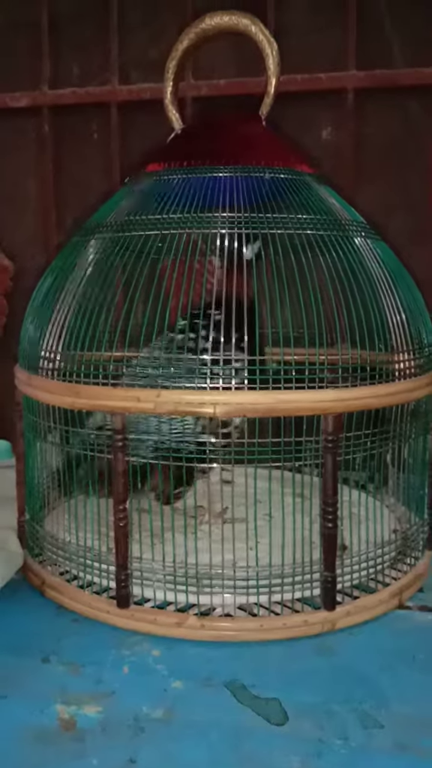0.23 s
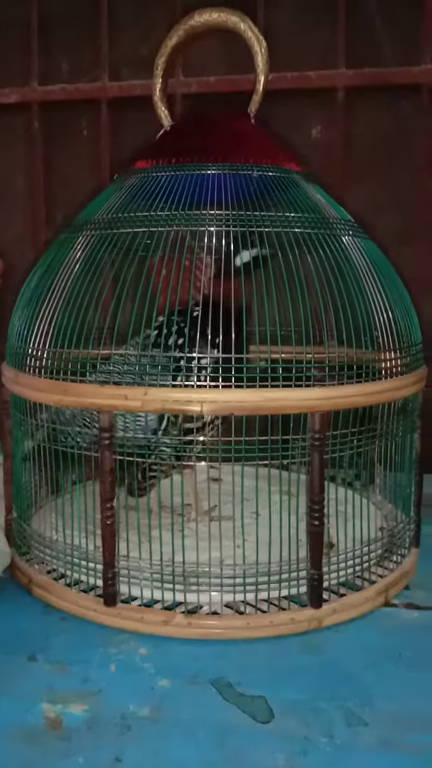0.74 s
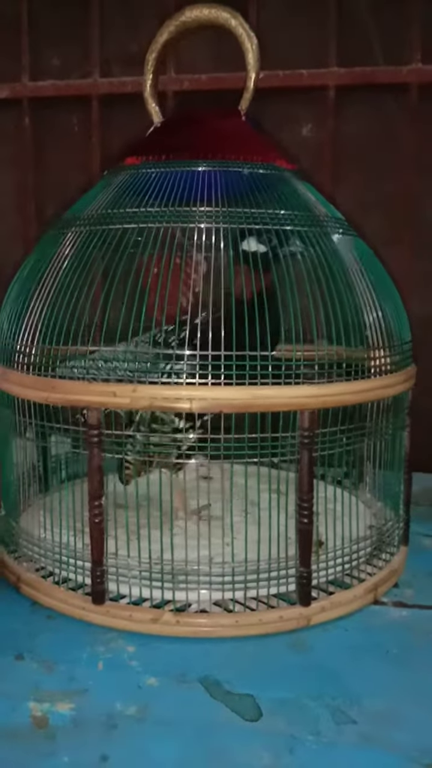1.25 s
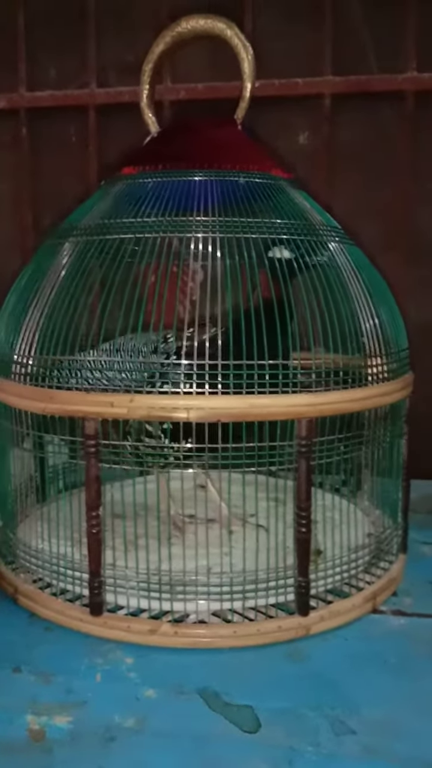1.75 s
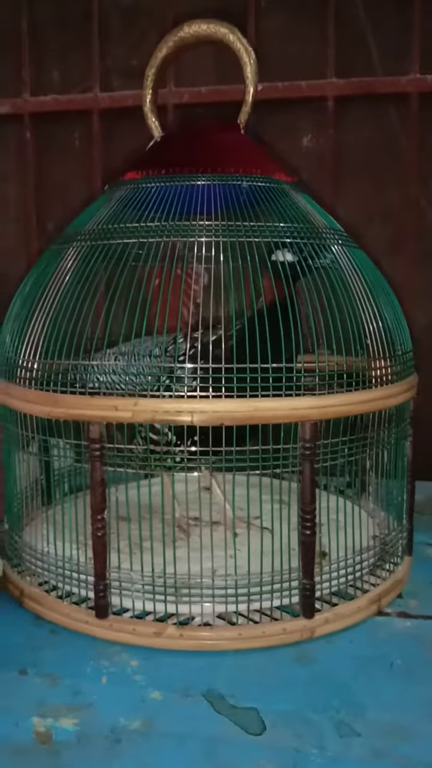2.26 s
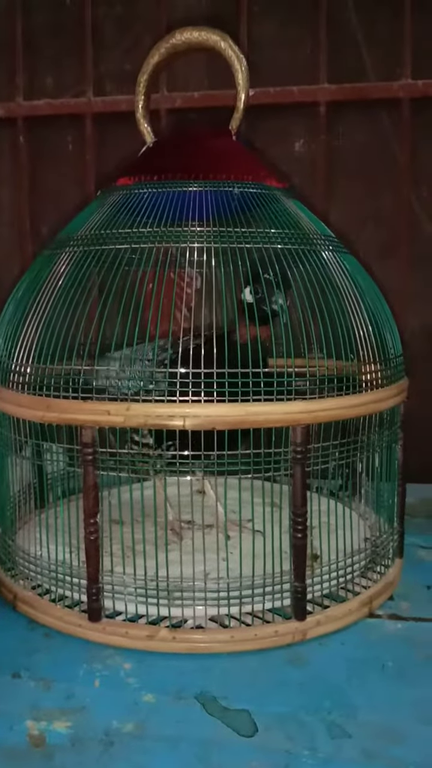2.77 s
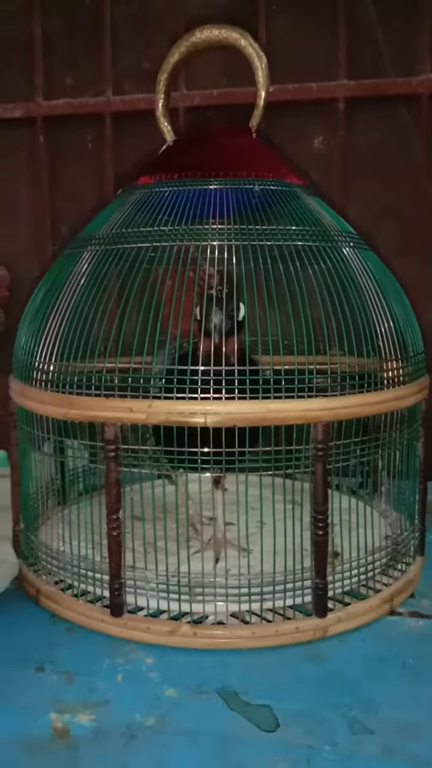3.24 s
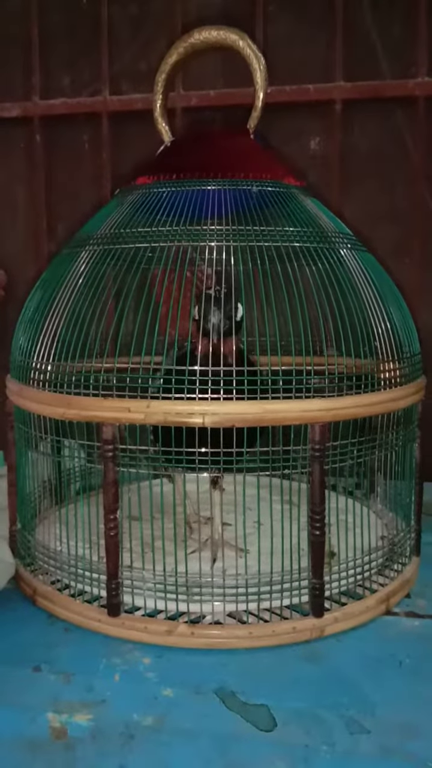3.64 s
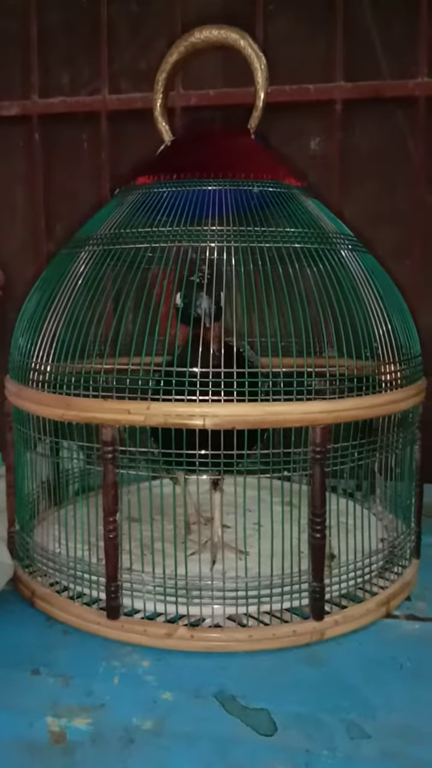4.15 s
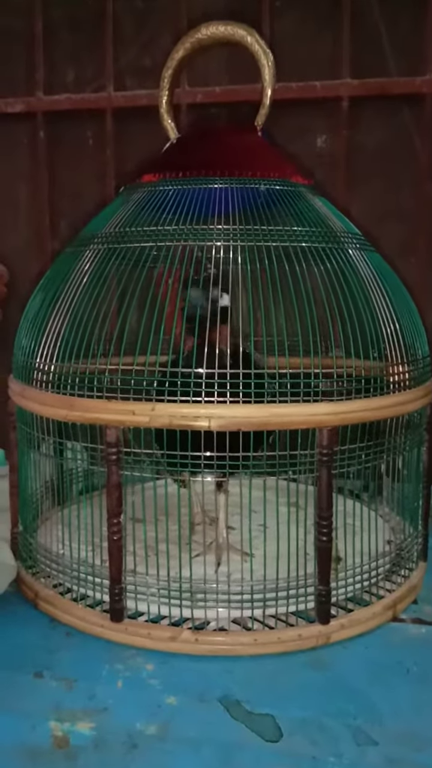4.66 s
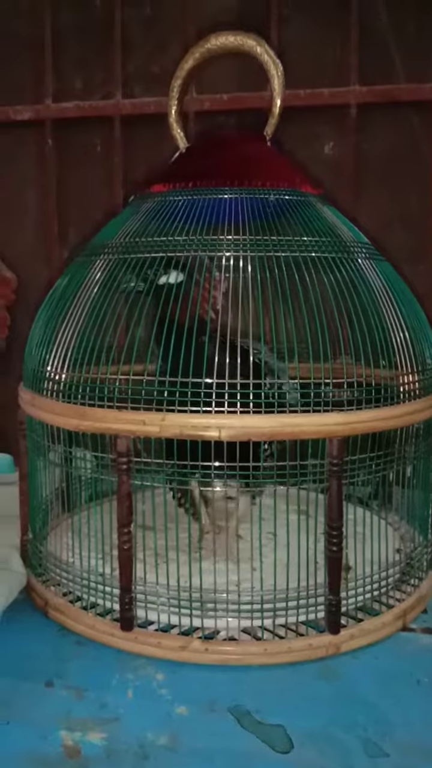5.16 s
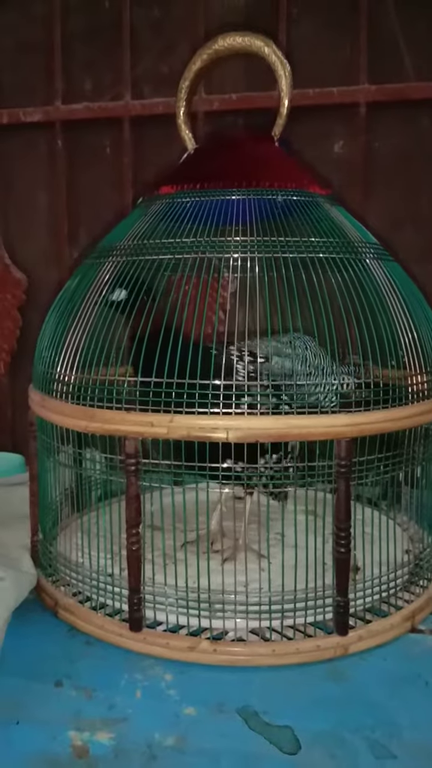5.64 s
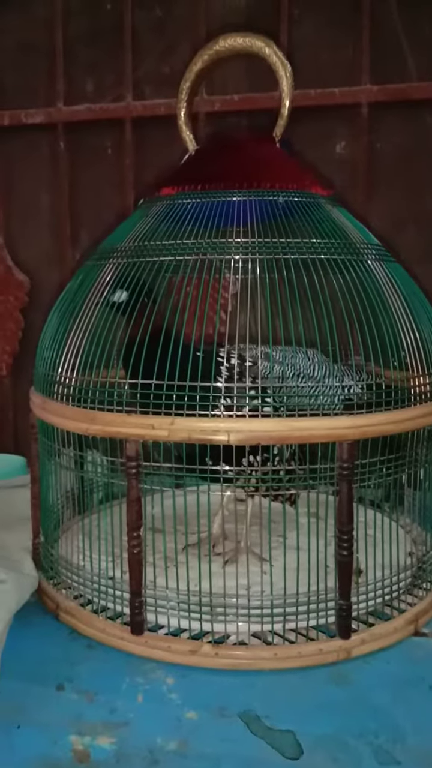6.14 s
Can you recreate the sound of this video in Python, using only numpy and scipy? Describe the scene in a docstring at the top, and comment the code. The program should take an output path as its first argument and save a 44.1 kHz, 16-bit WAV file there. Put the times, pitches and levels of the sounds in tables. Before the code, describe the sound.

At 0 seconds the echo of an earlier rasp still hangs in a bare, reflective room. From about 0.1 to 0.3 seconds a close caged game bird gives a loud harsh rasp with small clucks, ending in a very short, shrill rising whistle and a soft low thump. A second cluster follows from 0.6 to 0.95 seconds: clucks, short grating rasps and another piercing chirp, then a bright echo fading over roughly half a second. The gain ducks under the calls and climbs back. From 1.5 seconds a low steady hum and gentle hiss dominate, with faint insect-like throbbing and light, bright claw ticks on wire, clearest near 1.5, 2.9 and 3.2 seconds. A barely audible distant swell passes around 3. At 4.8 seconds comes a quiet double note, cluck then brief falling croak. The hum sinks away, leaving a faint bed and tiny ticks until about 6.4 seconds.

```python
"""Rasps, shrill whistles and small clucks end a caged game bird's loud call; later comes one short double note.
The rasps are pulses and breath ringing a throat, the whistles gliding sines, the clucks ringing modes.
A bare room echoes the bird. Soft thumps are dying sines; claws tick on the cage in bursts of bright noise.
Behind lie coloured noise, whose broad hum and hiss sinks away late on, and narrow bands, one throbbing like insects.
The recorder turns its gain down under the loud notes and lets it climb back in their tails."""
import sys
import numpy as np
from scipy import signal
from scipy.fft import rfft, irfft
from scipy.io import wavfile

SR = 44100
rng = np.random.default_rng(int(sys.argv[2]) if len(sys.argv) > 2 else 0)


def materialize(psi):
    """Save the field psi as 16-bit PCM at rate SR to the path in sys.argv[1].

    A 1-D psi becomes a single channel; in a 2-D psi each row is a channel.
    """
    bounded = np.clip(np.atleast_2d(psi).T, -1, 1)
    quanta = np.round(bounded * 32767).astype(np.int16)
    wavfile.write(sys.argv[1], SR, quanta)


N = 282240
LEAD = SR // 4   # samples before the start, so that an earlier note is still ringing
TOTAL = N + LEAD

# Rasped notes. Each row: start in seconds, length in seconds, relative level in dB, loss by the end in dB,
# weight of the 4 kHz throat mode in dB, weight of the 5.4 kHz mode in dB.
RASP_NOTES = [(-.2, 0.13, -6.5, -11, -13, 1), (0.125, 0.14, 6.5, 8.5, 3.5, 4),
              (.284, 0.031, 9, 11, -11, 0.5), (0.619, 0.072, 7, 6, -0.5, 3.5),
              (0.766, 0.0504, -0.5, -1, -15, 7), (0.825, .11, 4.5, 8, -4.5, 6)]
# Throat modes. Each row: pitch in Hz, width of each of two passes in Hz, level in dB.
# The second and third rows are the modes that the beak reweights.
THROAT_MODES = [(2817, 240, 1), (3895, 190, -5.5), (5338, 750, 2.5), (6170, 530, -4.5), (4724, 1160, 0.5),
                (3250, 2650, -2), (7100, 490, -7), (8780, 2700, -18), (15400, 2100, -24.5)]
# Whistles. Each row: start in seconds, length in seconds, pitch from in Hz, pitch to in Hz, climb in seconds,
# creep in Hz per second, level before the climb weakens it in dB, second partial at full pitch in dB.
WHISTLE_NOTES = [(.257, .031, 5900, 6470, .004, 3500, 3, -33),
                 (.794, .034, 5500, 6600, .015, -3500, 4, -33),
                 (4.781, .021, 2400, 5030, .004, 25000, -14, -12)]
# Clucks. Each row: start in seconds, level before the swell and decay in dB, pitch in Hz, upper mode relative in dB.
CLUCK_NOTES = [(.102, -24, 1310, 2.5), (.126, -17, 1520, 6), (.593, -25, 1430, 2), (.609, -18.5, 1430, -5),
               (.692, -9.5, 1380, -10), (.749, -16.5, 1307, 3), (.763, -8, 1380, -7),
               (.909, -16, 1410, -15), (4.768, -12.5, 1263, -9), (4.78, -9.5, 1404, -12.5)]
# Spectrum of the croak's partials. Each row: pitch in Hz, level in dB.
CROAK_SPECTRUM = [(700, -10), (1800, -7.5), (2600, -7), (3500, -2), (4500, -9), (6200, -5.5), (8500, -23.5),
                  (12000, -44), (15000, -26)]
# Room echoes. Each row: pitch in Hz, time to fall 60 dB in seconds, relative level in dB.
ROOM_DECAY = [(500, 0.39, 3), (2060, 0.85, 2.5), (6000, 0.64, 3), (6700, 0.77, 1), (10000, 0.44, 0.5),
              (15000, 0.44, 6)]
# Soft low thumps under the whistles. Each row: start in seconds, level before the swell and decay in dB,
# pitch in Hz, time to fall 60 dB in seconds.
LOW_THUMPS = [(.268, -10.5, 97, 0.11), (.795, -27, 110, 0.11)]
# Claws on the cage. Each row: start in seconds, level of the rattle in dB.
CLAW_TICKS = [(1.4734, -39.5), (2.0594, -50), (2.3894, -53), (2.9094, -39), (3.2013, -39.5),
              (3.2879, -39.5), (3.8911, -52), (4.1294, -43), (4.3313, -49), (4.5251, -42), (5.475, -53),
              (5.574, -52), (5.694, -43.5), (5.737, -52), (5.9628, -51), (6.336, -47)]
# Spectrum of the ticks. Each row: pitch in Hz, relative level in dB per Hz.
TICK_SPECTRUM = [(2000, -9), (5500, 13.5), (8000, 0.5), (12000, -22), (15300, 3)]
# Spectrum of the broad hum and hiss. Each row: pitch in Hz, relative level in dB per Hz.
HUM_SPECTRUM = [(18, -56), (30, -29.5), (97, 0), (148, 2.5), (332, -5.5), (479, -9), (921, -8.5),
                (1020, -17), (1260, -11), (2300, -24), (3590, -22), (5740, -8.5), (9190, -34), (12900, -49),
                (15500, -28.5)]
# Resonances added on top of the hum. Each row: pitch in Hz, width in Hz, gain in dB.
HUM_RESONANCES = [(5790, 20, 7.5), (2964, 79, 6), (4150, 250, 0), (338, 10, 0.5)]
# Spectrum of the bed that stays. Each row: pitch in Hz, relative level in dB per Hz.
STILL_SPECTRUM = [(30, -37), (55, -10.5), (114, 3), (213, -8), (292, -5), (399, -30.5), (1200, -23),
                  (1590, -36), (3320, -29.5), (4190, -18), (6200, -12.5), (8060, -55), (12600, -54),
                  (15500, -36)]
# Faint far sound that swells once. Each row: time in seconds, level in dB.
FAR_SWELL = [(2.88, -54), (3.0, -38), (3.18, -42), (3.3, -46)]
# Narrow bands of the background. Each row: pitch in Hz, width of each of two passes in Hz, level in dB,
# mean throbs per second, throb depth in dB, uneven flicker in dB.
NARROW_BANDS = [(7200, 320, -53, 9.9, 3.2, 1.5), (1245, 90, -63, 0, 0, 2.5), (4280, 500, -60, 0, 0, 1.0),
                (5850, 600, -60, 0, 0, 1.0), (15200, 900, -74, 0, 0, 3.5)]

# Rasps: pulse rate before jitter, jitter as a log spread, pulse spread in dB, breath against pulses of rms 1.
RASP_PER_S, RASP_JITTER, RASP_SPREAD_DB, RASP_BREATH = 560, 0.3, 2.5, 0.76
RASP_SWELL_SHARE, RASP_START_DB = 0.35, -15   # swell as a share of the note, and the level it starts from
RASP_RELEASE_S, RASP_RELEASE_DB = 0.0084, -25
NARROW_LOW_DB, NARROW_HIGH_DB = 13.5, -16   # narrow beak at first: 4 kHz mode up, 5.4 kHz mode down
RASP_EDGE_HZ = 2200   # only the windpipe mode bypasses this low cut
WINDPIPE_HZ, WINDPIPE_WIDTH_HZ, WINDPIPE_DB = 1350, 650, -23
# Whistles
PITCH_LAG_S, WHISTLE_EDGE_S, WHISTLE_RISE_DB = 0.002, 0.003, 0.5   # the pitch trails the muscle
CLIMB_DB_PER_SPEED = 75   # loss per octave per millisecond of upward glide
SECOND_DB_PER_OCTAVE = 70   # loss of the second partial while the pitch is low
# Clucks, with the puff of air that starts each one
CLUCK_OVERTONE, CLUCK_RISE_S, CLUCK_T60_S = 1.51, 0.00075, 0.029   # the overtone is a pitch ratio
PUFF_DB, PUFF_T60_S, PUFF_HZ, PUFF_WIDTH_HZ = -4.5, 0.029, 3800, 3500
# Croak
CROAK_S, CROAK_LENGTH_S, CROAK_EDGE_S, CROAK_DB, CROAK_SAG_DB = 4.866, 0.029, 0.006, -22, 5.5
CROAK_HZ, CROAK_FALL_HZ_PER_S, CROAK_BREATH = 953, 6600, 0.12
# Room
ROOM_DB, FIRST_ECHO_S = -5.5, 0.0031
ECHOES_PER_S, ECHO_GROWTH_S = 1200, 0.02   # density at first, time in which it doubles
FLUTTER_S, FLUTTER_SHARE = 0.0378, 0.49   # low sound bounces between two facing walls
FLUTTER_LOW_HZ, FLUTTER_CUT_HZ = 85, 3600
# Ticks and rustles
TICK_T60_S, SNAP_DB, SNAP_T60_S = 0.15, 5, 0.0052   # the snap's level is relative to its tick
RUSTLE_PER_S, RUSTLE_DB, RUSTLE_SPREAD_DB, RUSTLE_T60_S = 13, -69, 2.7, 0.057
# Background
HUM_DB, HUM_END_DB, HUM_STOP_S, HUM_FADE_S = -34.5, -59.5, 4.68, 0.48   # fade time constant
HUM_FLICKER_DB, HUM_FLICKER_S = 1.23, 0.031
BASS_HZ, BASS_WAVER_DB, BASS_WAVER_S = 313, 2.5, 0.022   # the bass of the hum swells and sinks by itself
STILL_DB = -52
SWELL_HZ, SWELL_WIDTH_HZ = 2540, 710
DIP_HZ, DIP_WIDTH_HZ, DIP_SHARE = 6650, 226, 0.6   # a narrow gap in the hiss
# Recorder
KNEE_DB, SQUEEZE, RELEASE_DB_PER_S = -10, 0.77, 110   # squeeze is dB of cut per dB above the knee
ATTACK_S, AHEAD_S, CUTOFF_HZ = 0.001, 0.003, 15560


def rasps():
    """The syrinx slams shut unevenly and air hisses through; both ring the throat, reweighted as the beak moves."""
    gate, level_db, low_db, high_db = in_time([rasp_shape(*row) for row in RASP_NOTES])
    slam_count = np.cumsum(RASP_PER_S * np.exp(RASP_JITTER * drift(0.001))) / SR
    pulses = np.diff(np.floor(slam_count), prepend=0)
    pulses = pulses * amp(RASP_SPREAD_DB * rng.standard_normal(TOTAL))
    breath = RASP_BREATH * rng.standard_normal(TOTAL)
    source = (rms_one(pulses) + breath) * gate * amp(level_db)
    weights = [1, amp(low_db), amp(high_db)] + [1] * 6
    voice = 0
    for k, (throat_mode, weight) in enumerate(zip(THROAT_MODES, weights)):
        voice = voice + (-1) ** k * mode(source * weight, *throat_mode)   # neighbours in opposite phase
    edge = signal.butter(4, RASP_EDGE_HZ, "high", fs=SR, output="sos")
    return signal.sosfilt(edge, voice) + mode(source, WINDPIPE_HZ, WINDPIPE_WIDTH_HZ, WINDPIPE_DB)


def rasp_shape(s, length, db, loss_db, low_db, high_db):
    """Swell while the beak opens, sag, quick release: rows of time in s, level dB and two mode weights in dB."""
    end_db = db - loss_db
    return [(s, db + RASP_START_DB, low_db + NARROW_LOW_DB, high_db + NARROW_HIGH_DB),
            (s + RASP_SWELL_SHARE * length, db, low_db, high_db),
            (s + length - RASP_RELEASE_S, end_db, low_db, high_db),
            (s + length, end_db + RASP_RELEASE_DB, low_db, high_db)]


def whistles():
    """Nearly pure glides with a weak second partial: the pitch climbs, then creeps, and a fast climb is weaker."""
    out = np.zeros(TOTAL)
    for s, length, from_hz, to_hz, climb, creep, db, second_db in WHISTLE_NOTES:
        t = np.arange(round(length * SR)) / SR
        hz = from_hz + (to_hz - from_hz) * smooth(np.minimum(t / climb, 1), PITCH_LAG_S) + creep * t
        octaves_under = np.maximum(np.log2(to_hz / hz), 0)
        speed = np.gradient(np.log2(hz), 1000 / SR)   # octaves per millisecond
        level_db = db - CLIMB_DB_PER_SPEED * speed + WHISTLE_RISE_DB * t / length
        edges = np.clip(np.minimum(t, length - t) / WHISTLE_EDGE_S, 0, 1)
        phase = 2 * np.pi * np.cumsum(hz) / SR
        second = amp(second_db - SECOND_DB_PER_OCTAVE * octaves_under) * np.sin(2 * phase)
        at = LEAD + round(s * SR)
        out[at:at + len(t)] += edges * amp(level_db) * (np.sin(phase) + second)
    return out * np.sqrt(2)   # a sine of rms 1 at 0 dB


def clucks():
    """Each cluck is a soft puff that hisses briefly and rings two modes of the windpipe for a few cycles."""
    ringing, starts = [], np.zeros(TOTAL)
    for s, db, hz, upper_db in CLUCK_NOTES:
        ringing.append((s, db, hz, CLUCK_T60_S))
        ringing.append((s, db + upper_db, hz * CLUCK_OVERTONE, CLUCK_T60_S))
        starts[LEAD + round(s * SR)] = amp(db + PUFF_DB)
    puffs = die_away(starts, PUFF_T60_S) * rng.standard_normal(TOTAL)
    return rings(ringing, CLUCK_RISE_S) + mode(puffs, PUFF_HZ, PUFF_WIDTH_HZ, 0)


def croak():
    """Regular pulses on a falling pitch: a stack of partials, slightly hoarse."""
    t = np.arange(round(CROAK_LENGTH_S * SR)) / SR
    hz = CROAK_HZ - CROAK_FALL_HZ_PER_S * t
    edges = np.clip(np.minimum(t, CROAK_LENGTH_S - t) / CROAK_EDGE_S, 0, 1) ** 2
    phase = 2 * np.pi * np.cumsum(hz) / SR
    stack = 0
    for k in range(1, 18):
        stack = stack + amp(at_hz(CROAK_SPECTRUM, k * hz)) * np.cos(k * phase + 0.081 * k * k)
    level = amp(CROAK_DB - CROAK_SAG_DB * t / CROAK_LENGTH_S)
    hoarseness = 1 + CROAK_BREATH * rng.standard_normal(len(t))
    out, at = np.zeros(TOTAL), LEAD + round(CROAK_S * SR)
    out[at:at + len(t)] = edges * level * rms_one(stack) * hoarseness
    return out


def room(x):
    """Echoes come singly at first and thicken fast; each third-octave band dies at its own rate."""
    t = np.arange(SR) / SR
    chance = np.minimum(ECHOES_PER_S * (1 + (t / ECHO_GROWTH_S) ** 2) / SR, 1)
    noise = rng.standard_normal(SR) * (rng.random(SR) < chance)
    noise = noise / np.sqrt(chance) * (t > FIRST_ECHO_S)   # fewer echoes are stronger ones
    table = np.array(ROOM_DECAY)
    edges = 500 * 2 ** np.arange(0, 5.1, 1 / 3)
    echoes = 0
    for low, high in zip(edges, edges[1:]):
        band = signal.sosfilt(signal.butter(4, [low, high], "band", fs=SR, output="sos"), noise)
        middle = np.sqrt(low * high)
        t60 = at_hz(table[:, [0, 1]], middle)
        level_db = at_hz(table[:, [0, 2]], middle)
        echoes = echoes + band * amp(level_db - 60 * t / t60)
    return signal.fftconvolve(x, echoes / np.sqrt(np.sum(echoes ** 2)))[:len(x)]


def thumps():
    """Soft low thumps: sines that swell in a few milliseconds and die."""
    return rings(LOW_THUMPS, 0.0083)


def ticks():
    """Claws set off short bright bursts of wire rattle that start with a snap, among fainter rustles at random."""
    envelope, t = np.zeros(TOTAL + SR // 5), np.arange(SR // 5) / SR
    for s, db in CLAW_TICKS:
        at = LEAD + round(s * SR)
        rattle = amp(db - 60 * t / TICK_T60_S)
        snap = amp(db + SNAP_DB - 60 * t / SNAP_T60_S)
        envelope[at:at + len(t)] += rattle + snap
    starts = rng.random(TOTAL) < RUSTLE_PER_S / SR
    starts = starts * amp(RUSTLE_DB + RUSTLE_SPREAD_DB * rng.standard_normal(TOTAL))
    noise = rms_one(coloured(rng.standard_normal(TOTAL), TICK_SPECTRUM))
    return (envelope[:TOTAL] + die_away(starts, RUSTLE_T60_S)) * noise


def hum_and_hiss():
    """Coloured noise with resonances and a wavering bass: steady, then sinking towards a low level."""
    hum = flutter(coloured(rng.standard_normal(TOTAL), HUM_SPECTRUM))
    hum = hum + sum(amp(db) * resonate(hum, hz, width) for hz, width, db in HUM_RESONANCES)
    bass = signal.sosfilt(signal.butter(2, BASS_HZ, fs=SR, output="sos"), hum)
    hum = hum + bass * (amp(BASS_WAVER_DB * drift(BASS_WAVER_S)) - 1)
    since_stop = np.maximum((np.arange(TOTAL) - LEAD) / SR - HUM_STOP_S, 0)
    level_db = HUM_END_DB + (HUM_DB - HUM_END_DB) * np.exp(-since_stop / HUM_FADE_S)
    return amp(level_db + HUM_FLICKER_DB * drift(HUM_FLICKER_S)) * rms_one(hum)


def still_bed():
    """Steady coloured noise that stays when the hum sinks."""
    return amp(STILL_DB) * rms_one(flutter(coloured(rng.standard_normal(TOTAL), STILL_SPECTRUM)))


def far_swell():
    """A faint far sound: one band of noise that swells once."""
    gate, level_db = in_time([FAR_SWELL])
    return gate * mode(amp(level_db) * rng.standard_normal(TOTAL), SWELL_HZ, SWELL_WIDTH_HZ, 0)


def narrow_bands():
    """Narrow bands of noise that flicker unevenly; those with a throb pulse like insects."""
    out = np.zeros(TOTAL)
    for hz, width, db, per_s, depth_db, flicker_db in NARROW_BANDS:
        throb = np.sin(2 * np.pi * np.cumsum(per_s * (1 + 0.03 * drift(0.1))) / SR)
        band = resonate(resonate(rng.standard_normal(TOTAL), hz, width), hz, width)
        out += amp(db + depth_db * throb + flicker_db * drift(0.06)) * rms_one(band)
    return out


def background():
    """All the background layers together, with a narrow gap in the hiss."""
    out = hum_and_hiss() + still_bed() + far_swell() + narrow_bands()
    return out - DIP_SHARE * resonate(out, DIP_HZ, DIP_WIDTH_HZ)


def flutter(x):
    """A feedback echo between facing walls that keeps mainly the lows: a comb of soft peaks in the bass."""
    hz = np.fft.rfftfreq(len(x), 1 / SR)
    low_cut = hz ** 4 / (hz ** 4 + FLUTTER_LOW_HZ ** 4)
    loop = FLUTTER_SHARE / (1 + (hz / FLUTTER_CUT_HZ) ** 2) * low_cut
    return irfft(rfft(x) / (1 - loop * np.exp(-2j * np.pi * hz * FLUTTER_S)), len(x))


def rings(events, rise_s):
    """Each event is a sine that swells briefly and dies: start in s, level dB, pitch Hz, t60 in s."""
    out, t = np.zeros(TOTAL), np.arange(SR // 8) / SR
    for s, db, hz, t60 in events:
        at = LEAD + round(s * SR)
        envelope = amp(db - 60 * t / t60) * (1 - np.exp(-t / rise_s))
        out[at:at + len(t)] += envelope * np.sin(2 * np.pi * hz * t)
    return out


def die_away(starts, t60):
    """Let each impulse decay by 60 dB in the given seconds."""
    return signal.lfilter([1], [1, -amp(-60 / (t60 * SR))], starts + 1e-18)


def mode(x, hz, width_hz, db):
    """A steep resonance; white noise of rms 1 comes out near the given level."""
    ringing = resonate(resonate(x, hz, width_hz), hz, width_hz)
    return amp(db) * ringing * np.sqrt(SR / (4 * np.pi * width_hz))


def resonate(x, hz, width_hz):
    """Two-pole resonance with a gain of about 1 on top."""
    r = np.exp(-np.pi * width_hz / SR)
    poles = [1, -2 * r * np.cos(2 * np.pi * hz / SR), r * r]
    return signal.lfilter([(1 - r * r) / 2, 0, (r * r - 1) / 2], poles, x + 1e-18)


def coloured(x, spectrum):
    """Give white noise the spectrum of a table."""
    hz = np.fft.rfftfreq(len(x), 1 / SR)
    return irfft(rfft(x) * amp(at_hz(spectrum, hz)), len(x))


def at_hz(points, hz):
    """Read a table on a log-frequency axis."""
    points = np.array(points)
    return np.interp(np.log(np.maximum(hz, 1)), np.log(points[:, 0]), points[:, 1])


def in_time(tables):
    """Columns of notes laid end to end, and a gate that is open inside the notes."""
    t = (np.arange(TOTAL) - LEAD) / SR
    s, *columns = np.transpose(np.vstack(tables))
    gate = sum((t >= rows[0][0]) & (t <= rows[-1][0]) for rows in tables)
    return [smooth(gate, 0.00056)] + [np.interp(t, s, column) for column in columns]


def drift(seconds):
    """Slow chance: twice-smoothed noise of rms 1."""
    return rms_one(smooth(smooth(rng.standard_normal(TOTAL), seconds), seconds))


def smooth(x, seconds):
    """One-pole low-pass."""
    r = np.exp(-1 / (max(seconds, 1e-4) * SR))
    return signal.lfilter([1 - r], [1, -r], x)


def rms_one(x):
    """Scale to rms 1."""
    return x / np.sqrt(np.mean(x ** 2) + 1e-20)


def amp(db):
    """dB to gain."""
    return 10 ** (np.asarray(db) / 20)


def scene():
    """The bird and its echoes, the thumps and ticks, and the background."""
    bird = rasps() + whistles() + clucks() + croak()
    mix = bird + amp(ROOM_DB) * room(bird) + thumps() + ticks() + background()
    return mix[None, LEAD:]


def record(dry):
    """Gain falls just ahead of peaks above a knee and climbs back at a steady rate; the top is cut."""
    settle = SR // 50
    start = np.concatenate([dry[0, :settle][::-1], dry[0]])   # the sensor is already settled at the start
    peak_db = 20 * np.log10(np.abs(start) + 1e-9)
    wanted_cut_db = SQUEEZE * np.maximum(peak_db - KNEE_DB, 0)
    climb_db = RELEASE_DB_PER_S * np.arange(len(start)) / SR
    cut_db = np.maximum.accumulate(wanted_cut_db + climb_db) - climb_db
    cut_db = smooth(smooth(cut_db, ATTACK_S), ATTACK_S)
    cut_db = np.interp(np.arange(N) + settle + AHEAD_S * SR, np.arange(len(start)), cut_db)
    top_cut = signal.ellip(14, 0.5, 75, CUTOFF_HZ, fs=SR, output="sos")
    return signal.sosfilt(top_cut, dry * amp(-cut_db))


dry = scene()
out = record(dry)
materialize(out)
```